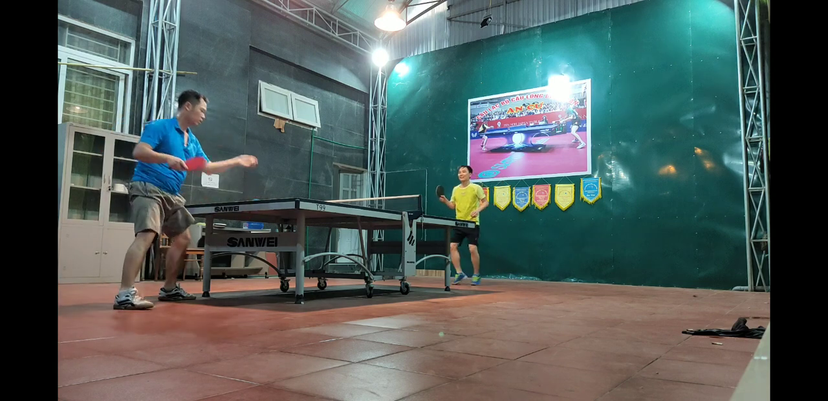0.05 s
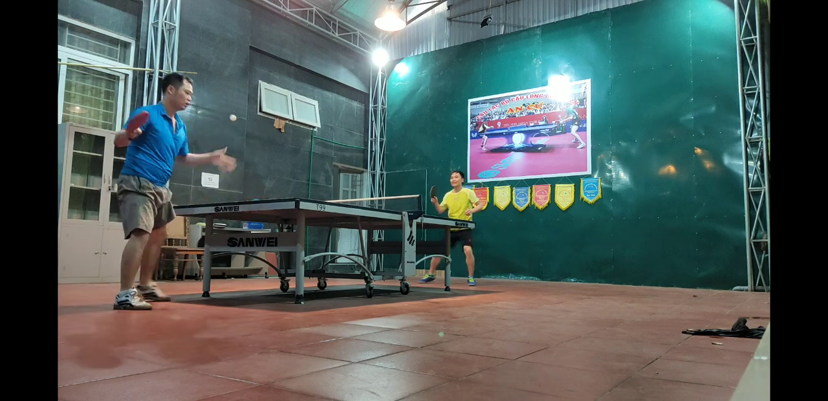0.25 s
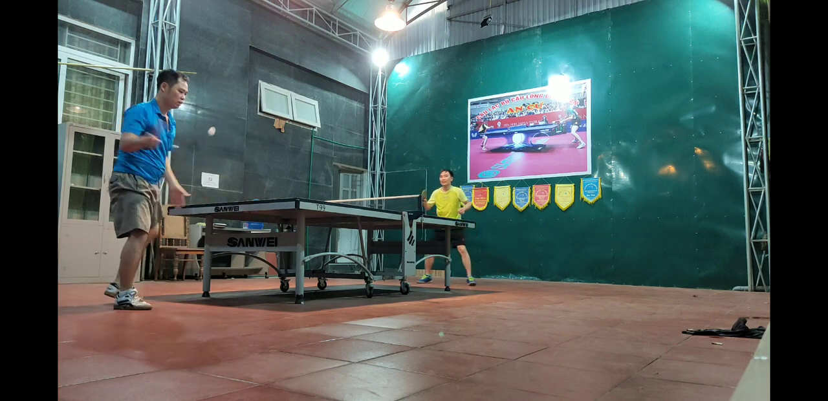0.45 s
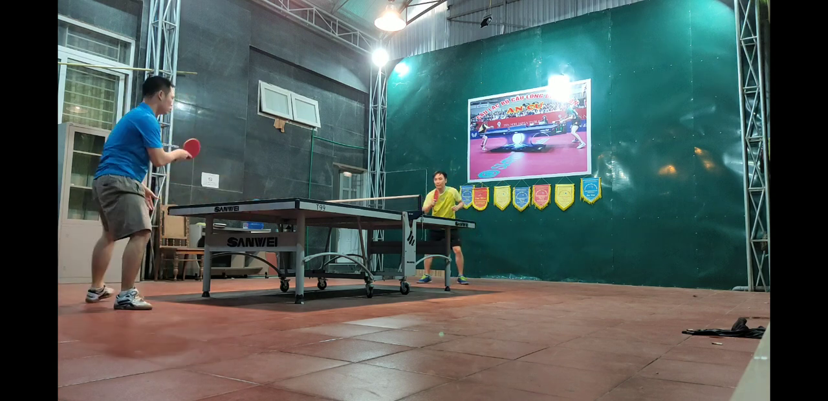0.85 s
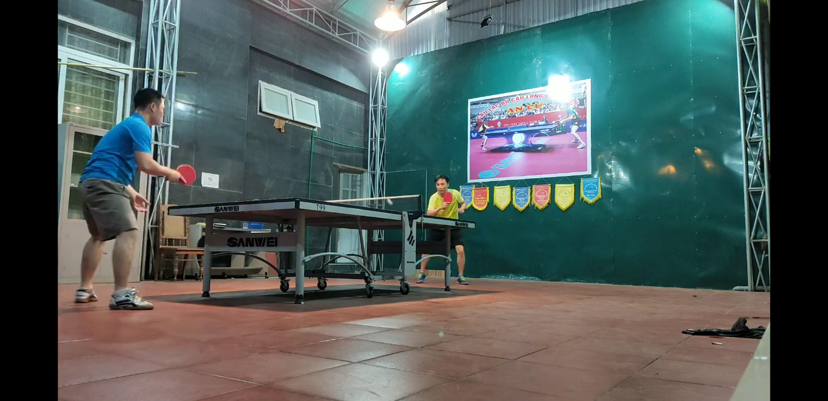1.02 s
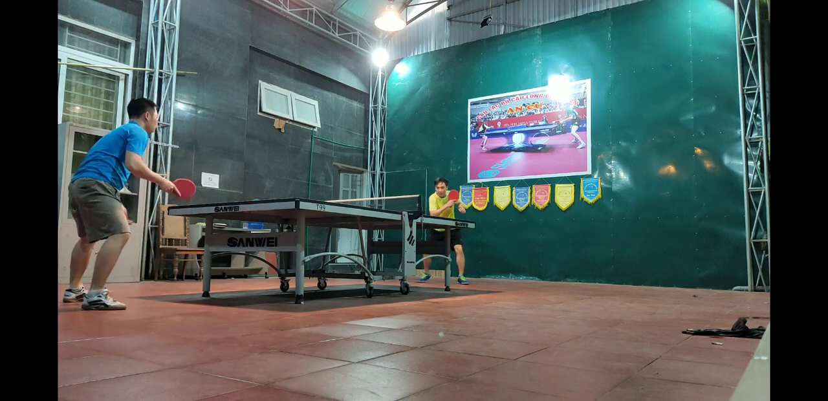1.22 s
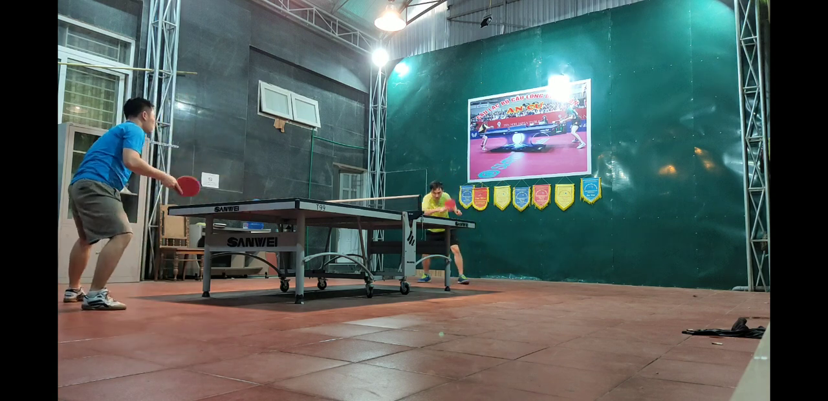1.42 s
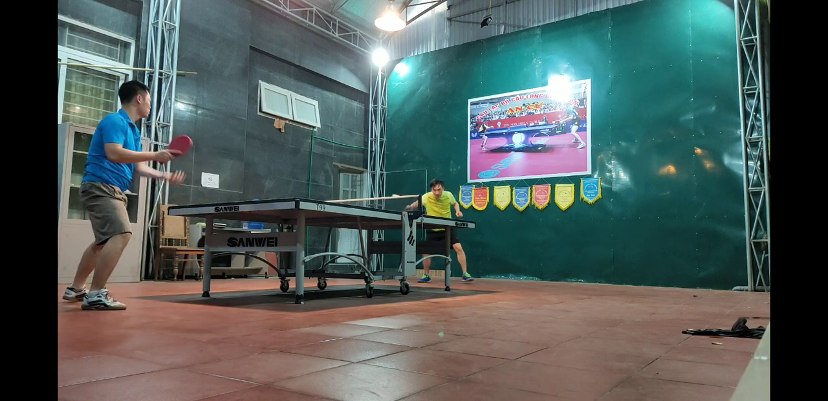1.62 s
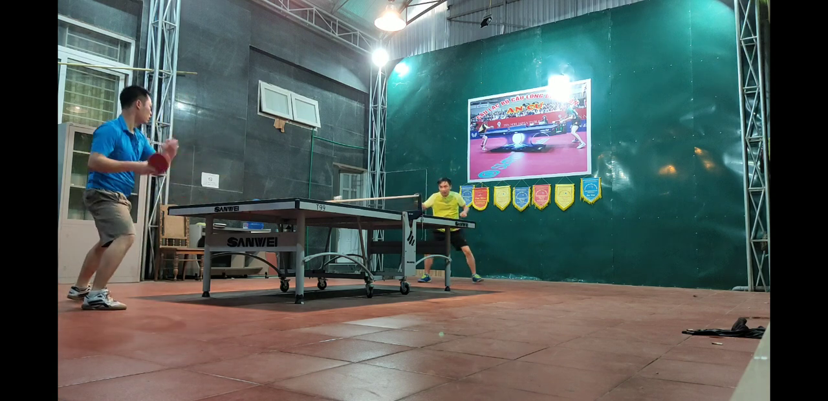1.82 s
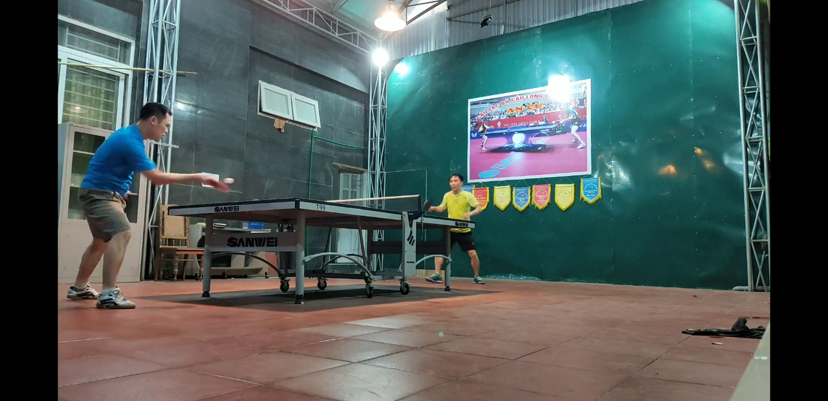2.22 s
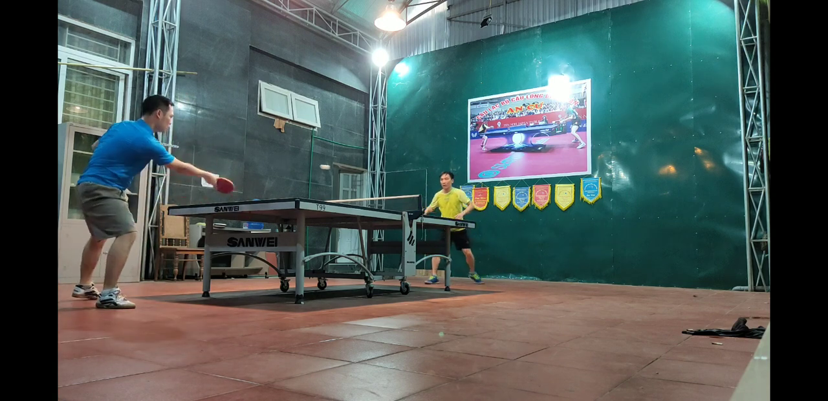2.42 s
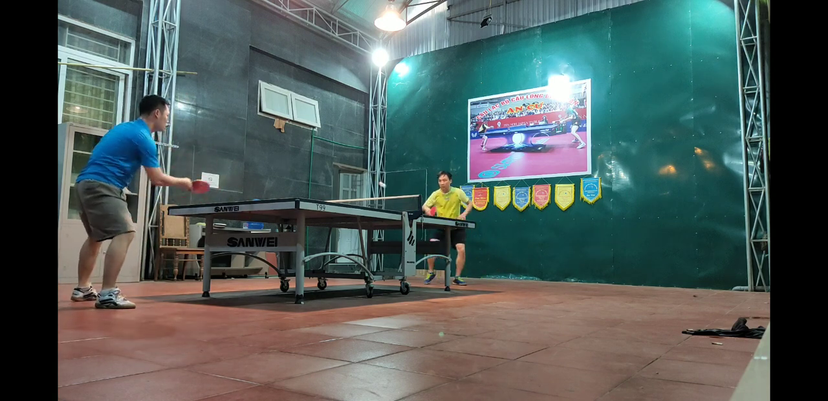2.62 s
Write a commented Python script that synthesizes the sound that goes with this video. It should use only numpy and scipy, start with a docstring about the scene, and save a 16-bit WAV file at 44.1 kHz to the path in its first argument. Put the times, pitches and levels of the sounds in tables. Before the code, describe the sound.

Sharp table tennis hits ring through a hard, reverberant hall. After soft footfalls and a shoe scuff, three paddle strokes alternate with three table bounces, picked up near the tiled floor over a steady background wash.

```python
"""A table tennis ball is served and rallied in a hard, echoing hall, heard from near the tiled floor.
Each impact excites the modes of the colliding bodies: the ball cracks on the bats and pings on the table.
The walls reflect each hit, and the reflections merge into a reverberant tail.
Shoes land softly and scuff by sliding friction, above a steady wash of room noise and a faint hum."""
import sys
import numpy as np
from scipy import signal
from scipy.fft import rfft, irfft
from scipy.io import wavfile
from scipy.ndimage import uniform_filter1d

SR = 44100
rng = np.random.default_rng(int(sys.argv[2]) if len(sys.argv) > 2 else 0)


def dump(signal):
    """Clip the signal to [-1, 1] and save it as 16-bit WAV at the path in sys.argv[1]."""
    limited = np.clip(np.atleast_2d(signal).T, -1, 1)
    pcm = np.round(limited * 32767).astype(np.int16)
    wavfile.write(sys.argv[1], SR, pcm)


N = 121275

# spectra of room noise, sole friction and contact clicks: frequency_hz, level_db
WASH_SPECTRUM = [(20, -6), (45, -10), (75, -31), (130, -21), (200, -19.5), (300, -13), (440, -0.5),
                 (560, -4), (850, -5.5), (1250, -5), (1700, -8.5), (3000, -4.5), (4200, -2), (6500, -8),
                 (8500, -18.5), (10000, -22), (12000, -43), (16000, -53)]
SCUFF_SPECTRUM = [(300, -26), (1500, -38), (2400, -6), (4000, 1), (5200, 4), (6600, 3.5), (8300, -11),
                  (10000, -14), (11500, -29), (16000, -39)]
BAT_CLICK_SPECTRUM = [(100, -60), (250, -34), (500, -4), (1000, -36), (1600, 8.5), (2200, 12), (2800, 10.5),
                      (3600, 18.5), (6300, 20), (7300, 17), (10300, 5.5), (11200, -7), (13000, -5),
                      (16000, -34.5)]
TABLE_CLICK_SPECTRUM = [(100, -62), (250, -21.5), (500, -11.5), (1200, -22), (1900, 3.5), (2700, -19.5),
                        (3500, 5), (4400, -3.5), (6500, 3), (7400, -2), (9900, 1), (11200, -10.5),
                        (13000, -22), (16000, -41)]
# hum partials: pitch_hz, level_db
HUM_TONES = [(64.6, -65), (96.9, -65.5)]
# soft low thuds (the fading ring of an earlier hit, then shoe landings): start_s, level_db
THUDS = [(0.0, -8), (.18, -12), (.625, -3.5)]
# slides of a sole: start_s, length_s, hiss_db, squeal_db
SHOE_SCUFFS = [(0.152, 0.16, -28, -40), (0.259, 0.24, -28, -40), (1.022, 0.2, -36, -46.5),
               (1.171, 0.16, -25.5, -41.5), (1.874, 0.39, -38, -46), (2.546, 0.28, -36.5, -46.5)]
# resonances of a sliding sole: pitch_hz, width_hz, level_db
SQUEAL_BANDS = [(2903, 72, 6), (8300, 370, -1.5), (8716, 25, 11.5)]
# ball on bat: start_s, click_db, knock_db, overtone_db, shell_db, crack_db, crack_hz,
# click_direct_db, knock_direct_db, wall_db
BAT_STROKES = [(.6607, 10, -7.5, -23, 6.5, 3, 4110, -7.5, -9, -0.5),
               (1.604, 11, 2, -7.5, 0, 4, 3970, -7, 2.5, -8),
               (2.3440, 4, -8, -1.5, 6.5, 1.5, 5180, -7, 0, -9)]
# ball on table: start_s, click_db, knock_db, shell_db, direct_db, wall_delay_s, wall_db
TABLE_BOUNCES = [(0.7433, 12, 0.5, 17, -12, 0.029, -25), (1.2459, 9, 0.5, 6.5, -14, 0.022, -4.5),
                 (2.1072, 4.5, -5.5, 7, -15, 0.057, -6)]
# modes of thud, bat blade, table board, ball shell and hall: pitch_hz, level_db, t60_s
THUD_MODES = [(481, -4.5, 0.071), (753, 1.5, 0.025), (889, 6.5, 0.018)]
BLADE_MODES = [(599, -3, 0.022), (726, 12, 0.019), (930, 1.5, 0.011), (1037, 13, 0.01), (1396, 0.5, 0.025)]
BLADE_HIGH_MODE = [(3400, 0, 0.016)]
BOARD_MODES = [(625, -1, 0.044), (853, 3, 0.0068), (1078, 2, 0.0099), (1449, 1.5, 0.022)]
SHELL_BAT_MODES = [(8420, 1, 0.0053), (9310, -5.8, 0.005)]
SHELL_TABLE_MODES = [(8114, -3.8, 0.014), (8370, 1, 0.0095)]
LINGERING_MODES = [(980, 0.2, 0.82), (1344, -2.4, 2.9)]
# early reflections from floor, table and walls: delay_s, level_db
CRACK_REFLECTIONS = [(.0026, -5), (.0062, -11), (.0092, -8), (.0285, -14)]
KNOCK_REFLECTIONS = [(.0045, -5), (.0145, -1), (.0235, -5)]
TABLE_REFLECTIONS = [(.0035, -6), (.0088, -9), (.0255, -12), (.051, -15), (.074, -16)]
# reverberation time of the hall: frequency_hz, t60_s
HALL_DECAY = [(200, 1.2), (500, 1.02), (1000, 3.5), (2000, 1.68), (3500, 0.99), (6000, 0.87), (8400, 0.68),
              (12000, 0.65), (16000, 0.72)]


def amp(db):
    """Amplitude grows tenfold per 20 dB."""
    return 10 ** (np.asarray(db) / 20)


def unit_rms(x):
    """Normalisation to a mean power of 1."""
    return x / np.sqrt(np.mean(x ** 2) + 1e-20)


def unit_energy(x):
    """Normalisation to a total energy of 1."""
    return x / np.sqrt(np.sum(x ** 2) + 1e-20)


def curve_at(points, hz):
    """Linear interpolation on a log-frequency axis."""
    f, value = np.transpose(points)
    return np.interp(np.log(hz + 1), np.log(f), value)


def add(mix, start_s, sound):
    """Superposition: a sound sums into the mix from its start time."""
    part = mix[max(round(start_s * SR), 0):][:len(sound)]
    part += sound[:len(part)]


def colour(x, curve_db):
    """Zero-phase filtering by a gain in dB that depends on frequency."""
    hz = np.fft.rfftfreq(2 * len(x), 1 / SR)
    return irfft(rfft(x, 2 * len(x)) * amp(curve_db(hz)))[:len(x)]


def room_noise(level_db=-37, patch_db=2.3):
    """Random modulation: patches of a broadband wash drift up and down in level."""
    hz, _, bins = signal.stft(rng.standard_normal(N), SR, nperseg=2048, noverlap=1536)
    patches = uniform_filter1d(rng.standard_normal(bins.shape), size=20, axis=0)
    patches = unit_rms(uniform_filter1d(patches, size=10, axis=1))
    gain = amp(curve_at(WASH_SPECTRUM, hz)[:, None] + patch_db * patches)
    wash = signal.istft(bins * gain, SR, nperseg=2048, noverlap=1536)[1][:N]
    return amp(level_db) * unit_rms(wash)


def hum(depth=0.32):
    """Slow amplitude modulation makes two low tones waver."""
    t = np.arange(N) / SR
    out = np.zeros(N)
    for hz, db in HUM_TONES:
        waver = sum(np.sin(2 * np.pi * (rate_hz * t + rng.random())) for rate_hz in np.geomspace(.3, 3, 10))
        out += amp(db) * np.sqrt(2) * (1 + depth * unit_rms(waver)) * np.sin(2 * np.pi * hz * t)
    return out


def thuds():
    """Damped modes give soft low thuds: the fading ring of an earlier hit, then shoe landings."""
    out = np.zeros(N)
    for start_s, db in THUDS:
        thud = amp(db) * ring(THUD_MODES)
        add(out, start_s, propagate(thud, thud, direct_db=-6.5, reflections=[]))
    return out


def ring(modes, size=4096, rise_cycles=1.07):
    """Free vibration: each mode swells, then decays exponentially; its level sets its energy share."""
    t = np.arange(size) / SR
    out = np.zeros(size)
    for k, (hz, db, t60_s) in enumerate(modes):
        rise = 1 - np.exp(-(hz * t / rise_cycles) ** 2)
        decay = np.exp(-np.log(1000) * t / t60_s)
        out += (-1) ** k * amp(db) * unit_energy(np.sin(2 * np.pi * hz * t) * rise * decay)
    return unit_energy(out)


def propagate(radiated, beamed, direct_db, reflections):
    """Multipath travel: radiated sound reverberates; beamed sound arrives directly and as echoes."""
    out = hall(radiated)
    for delay_s, db in [(0, direct_db)] + reflections:
        add(out, delay_s, amp(db) * beamed)
    return out


def hall(x, size=2 * SR, spread_db=5, ripple_db=4.5, delay_s=.004, build_s=.018, gain_db=2):
    """Reverberation: uneven reflections build a diffuse tail whose treble dies before its middle."""
    reflections, strengths = rng.standard_normal((2, size))
    hz, t, bins = signal.stft(reflections * amp(spread_db * strengths), SR, nperseg=512)
    # a random ripple gives each tail's treble a faintly tonal colour
    ripple = amp(ripple_db * np.clip(rng.standard_normal(len(hz)), -2, 1) * (hz > 2500))
    decay = np.exp(-np.log(1000) * t / curve_at(HALL_DECAY, hz)[:, None])
    tail = signal.istft(bins * decay * ripple[:, None], SR, nperseg=512)[1][:size]
    build = 1 - np.exp(-np.maximum(np.arange(size) / SR - delay_s, 0) / build_s)
    return amp(gain_db) * signal.fftconvolve(x, unit_energy(tail * build))


def scuffs(attack_s=0.055, release_s=0.03, squeal_hold_s=0.13, grit_db=-2):
    """Sliding friction: a sole on tile gives a gritty hiss and a thin squeal that outlasts it."""
    out = np.zeros(N)
    t = np.arange(SR // 2) / SR
    attack = np.clip(t / attack_s, 0, 1)
    for start_s, length_s, hiss_db, squeal_db in SHOE_SCUFFS:
        slips, strengths, drive = rng.standard_normal((3, len(t)))
        hiss = unit_rms(colour(slips * amp(grit_db * strengths), lambda f: curve_at(SCUFF_SPECTRUM, f)))
        squeal = unit_rms(colour(drive, squeal_response_db))
        hiss *= np.clip((length_s - t) / release_s, 0, 1)
        squeal *= np.clip((length_s + squeal_hold_s - t) / release_s, 0, 1)
        add(out, start_s, attack * (amp(hiss_db) * hiss + amp(squeal_db) * squeal))
    return amp(0.5) * out + amp(-5) * hall(out)[:N]


def squeal_response_db(f):
    """Resonance: the sole responds in narrow peaks."""
    return 20 * np.log10(sum(amp(db) / (1 + (2 * (f - hz) / width) ** 2) for hz, width, db in SQUEAL_BANDS))


def bat_strokes(crack_t60_s=.006, wall_delay_s=.0358):
    """Impact on rubber: a click and a crack, with modes ringing in wooden blade, ball shell and hall."""
    out = np.zeros(N)
    for (start_s, click_db, knock_db, overtone_db, shell_db, crack_db, crack_hz,
         click_direct_db, knock_direct_db, wall_db) in BAT_STROKES:
        tick = amp(click_db) * click(BAT_CLICK_SPECTRUM)
        knock = amp(knock_db) * ring(BLADE_MODES)
        crack = amp(crack_db) * ring([(crack_hz, 0, crack_t60_s), (crack_hz * 1.55, -14.5, crack_t60_s)])
        overtone = amp(overtone_db) * ring(BLADE_HIGH_MODE)
        shell = amp(shell_db) * ring(SHELL_BAT_MODES)
        radiated = tick + overtone + shell + amp(-23) * crack
        beamed = crack + amp(click_direct_db) * scatter(tick, spread_s=.002)
        add(out, start_s, propagate(radiated, beamed, 0, CRACK_REFLECTIONS + [(wall_delay_s, wall_db)]))
        add(out, start_s, propagate(knock, knock, knock_direct_db, KNOCK_REFLECTIONS))
        add(out, start_s, amp(knock_db - 11) * ring(LINGERING_MODES, size=2 * SR))
    return out


def click(spectrum, size=4096):
    """Minimum phase packs the energy of a spectrum into the start of a pulse."""
    log_gain = np.log(amp(curve_at(spectrum, abs(np.fft.fftfreq(size, 1 / SR)))))
    response = np.exp(np.conj(signal.hilbert(log_gain)))
    return unit_energy(np.fft.ifft(response).real)


def scatter(x, spread_s, size=512):
    """Scattering smears a click over many short paths round the bat, table edge and frame."""
    paths = rng.standard_normal(size) * np.exp(-np.arange(size) / SR / spread_s)
    return unit_energy(signal.fftconvolve(x, paths)[:len(x)]) * np.linalg.norm(x)


def table_bounces():
    """Impact on the hard top: the shell pings and the board knocks, heard mostly as reverberation."""
    out = np.zeros(N)
    for start_s, click_db, knock_db, shell_db, direct_db, wall_delay_s, wall_db in TABLE_BOUNCES:
        tick = amp(click_db) * click(TABLE_CLICK_SPECTRUM)
        knock = amp(knock_db) * ring(BOARD_MODES)
        shell = amp(shell_db) * ring(SHELL_TABLE_MODES)
        beamed = amp(-1.5) * scatter(tick, spread_s=.0042) + amp(-4) * knock + shell
        reflections = TABLE_REFLECTIONS + [(wall_delay_s, wall_db)]
        add(out, start_s, propagate(tick + knock + shell, beamed, direct_db, reflections))
    return out


def scene():
    """Superposition of rally, footwork and room in one channel."""
    return (bat_strokes() + table_bounces() + scuffs() + thuds() + room_noise() + hum())[None]


def record(dry):
    """Frequency response of the microphone: a narrow treble dip, then a band limit."""
    notch_hz, width_hz, notch_db, cutoff_hz = 7710, 236, -11.5, 15900
    notched = colour(dry[0], lambda f: notch_db * np.exp(-((f - notch_hz) / width_hz) ** 2))
    lowpass = signal.firwin(511, cutoff_hz, window=("kaiser", 9), fs=SR)
    return signal.oaconvolve(notched, lowpass, "same")[None]


dry = scene()
out = record(dry)
dump(out)
```